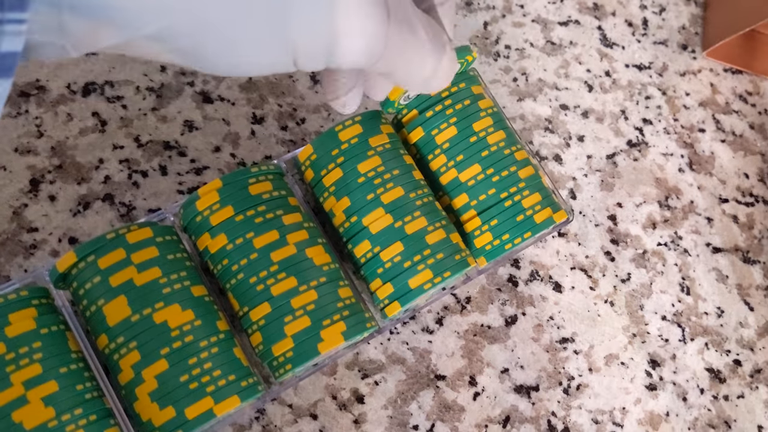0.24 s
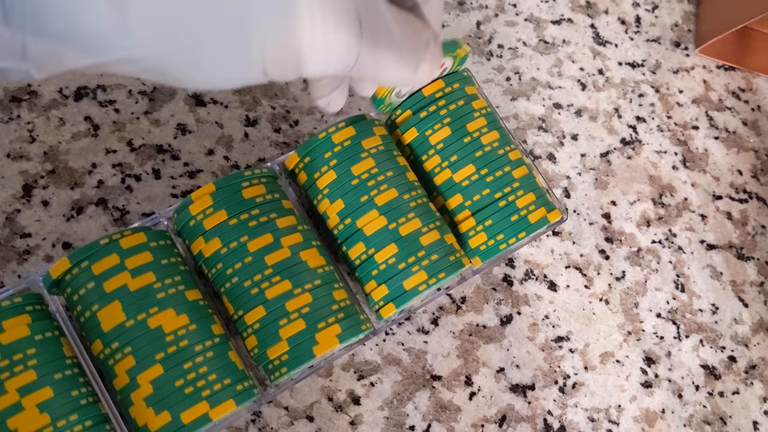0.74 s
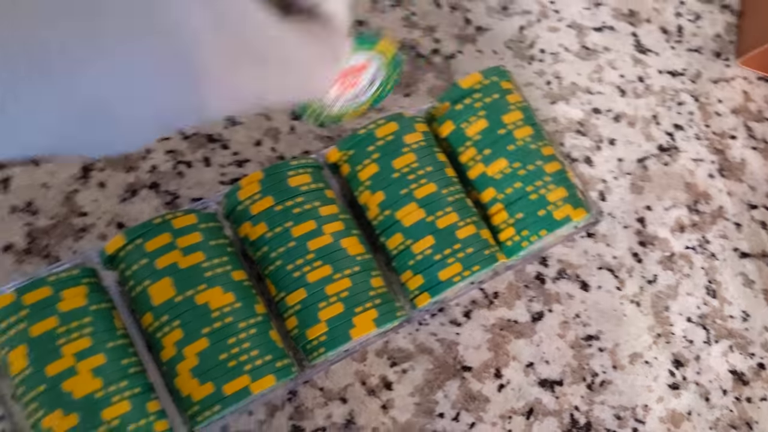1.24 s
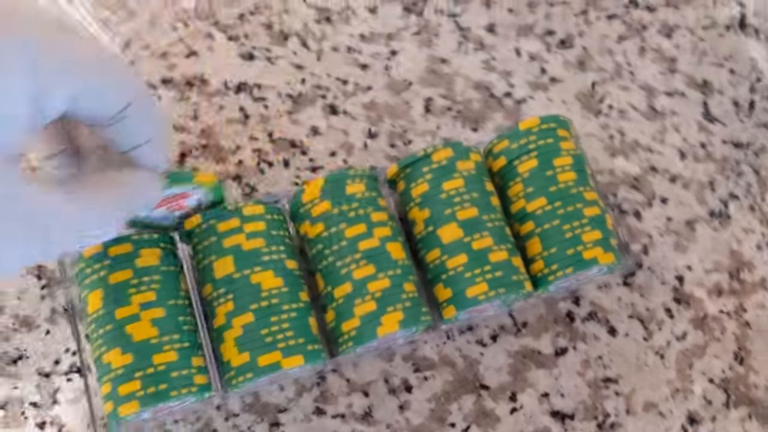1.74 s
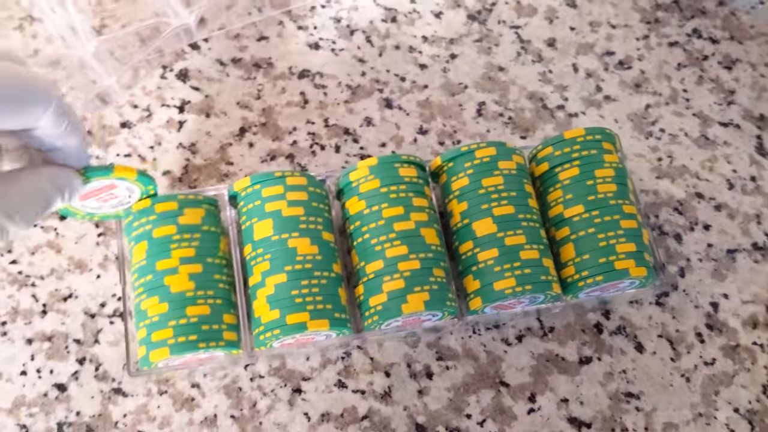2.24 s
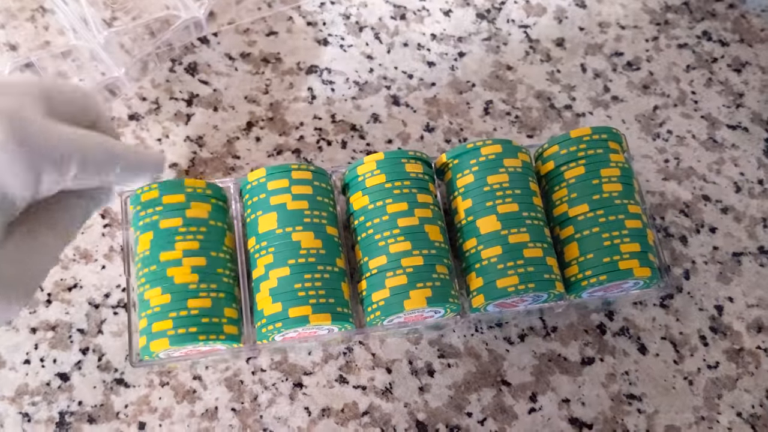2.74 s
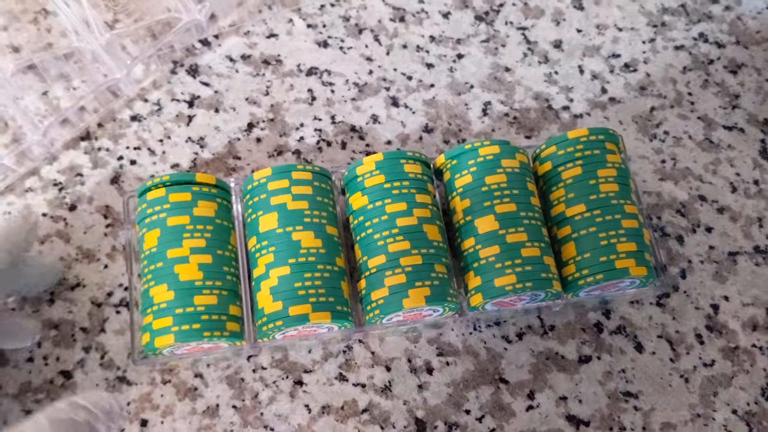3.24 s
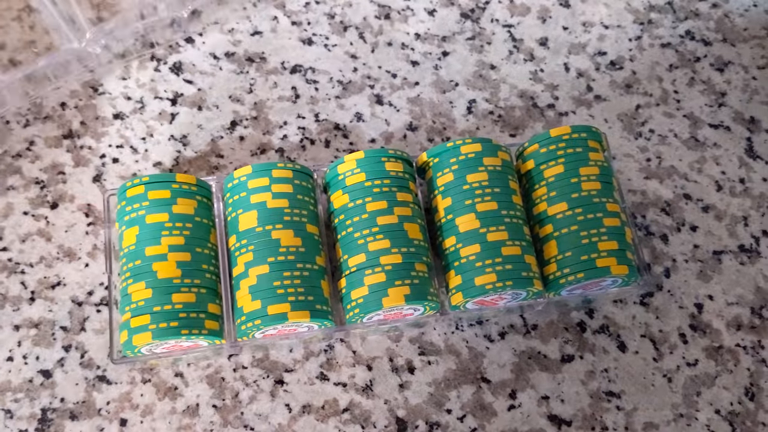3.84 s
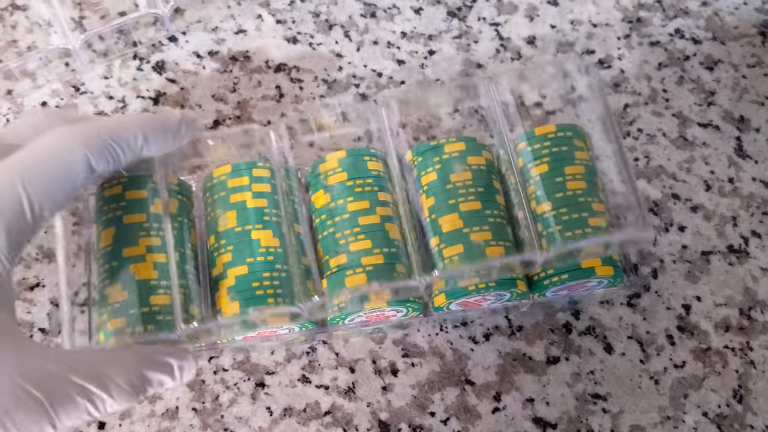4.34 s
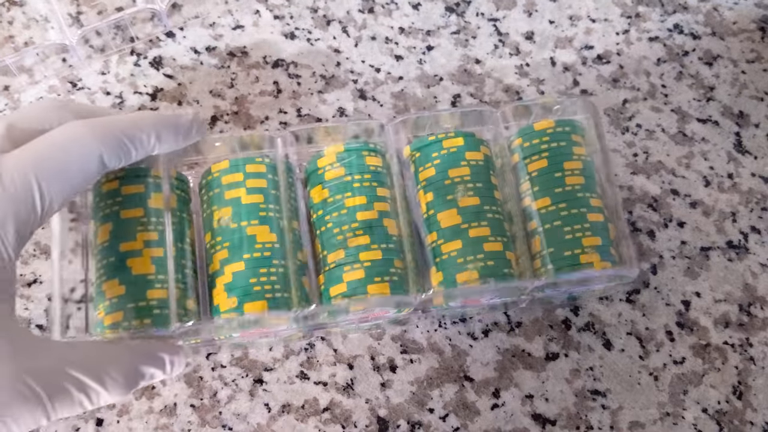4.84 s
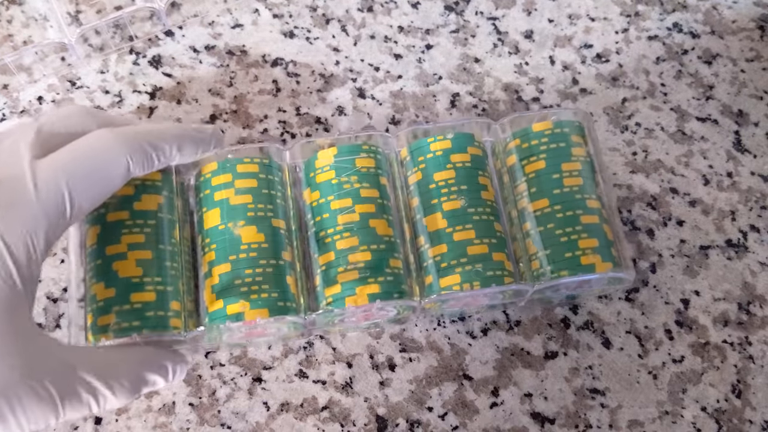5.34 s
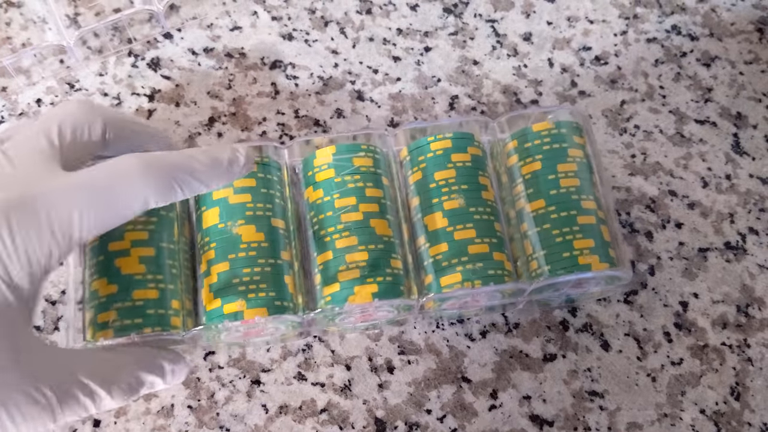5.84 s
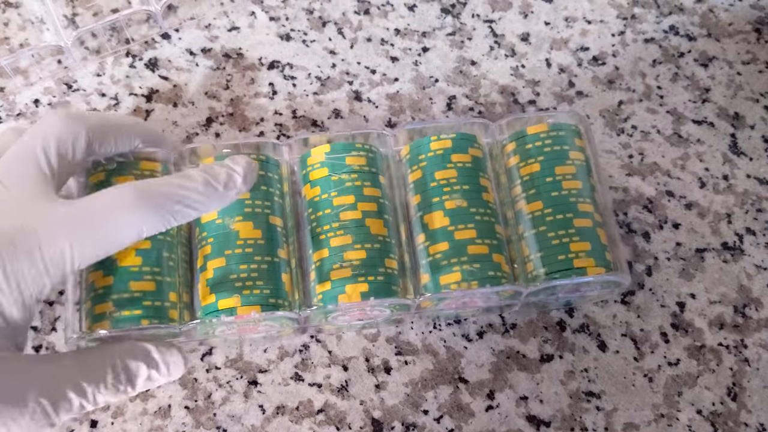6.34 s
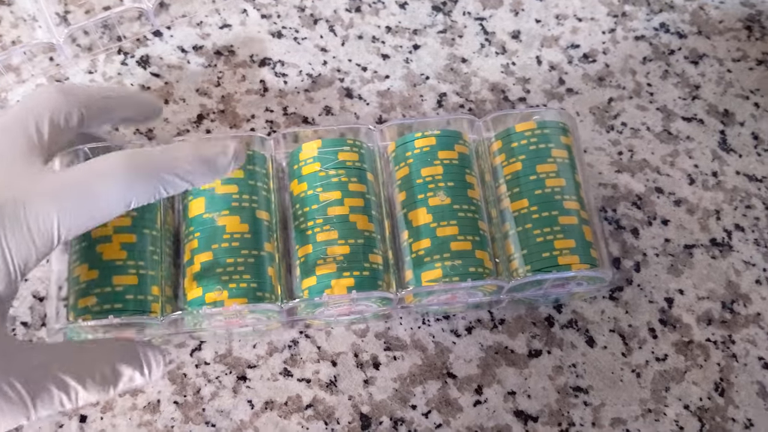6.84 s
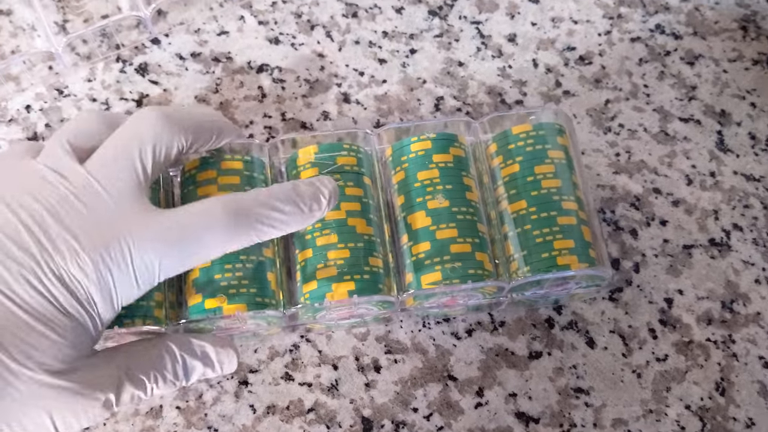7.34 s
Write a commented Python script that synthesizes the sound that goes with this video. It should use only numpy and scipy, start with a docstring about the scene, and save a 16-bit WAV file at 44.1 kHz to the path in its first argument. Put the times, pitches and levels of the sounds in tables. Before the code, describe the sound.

Close up in a small hard room, a clay chip clacks on packed chips in quick crisp taps, drags along them with a dry rub and is pushed in. After a lull with faint ticks, an empty plastic rack bumps the counter, then knocks loudly as a lid and scrapes down in jerky shoves, the stone booming softly beneath. Faint steady background noise.

```python
"""At first a gloved hand taps a clay poker chip on rows of chips, drags it along them and pushes it in.
Then the thin edge of an empty clear plastic rack ticks, the rack bumps on the counter and is worked down
over the rows as a lid: it knocks, sticks and scrapes. Blows are decaying modes, friction is random slips
and jerks, the glove is soft hiss. Throughout, the stone counter booms softly under the blows and rubbing,
a small hard room answers, and background noise runs underneath."""
import sys
import numpy as np
from scipy import signal
from scipy.fft import rfft, irfft, next_fast_len
from scipy.io import wavfile
from scipy.ndimage import uniform_filter1d, map_coordinates

SR = 44100
rng = np.random.default_rng(int(sys.argv[2]) if len(sys.argv) > 2 else 0)


def dump_mix(stems):
    """Bounce the given channels to the path in sys.argv[1] as a 16-bit WAV at rate SR."""
    frames = np.atleast_2d(stems).T  # one column per channel
    limited = np.clip(frames, -1, 1)  # hard clip at full scale
    pcm = np.round(limited * 32767).astype(np.int16)
    wavfile.write(sys.argv[1], SR, pcm)


N = 334719

# Levels in dB are relative, ahead of the trims in the source functions and of the ports.
# Background of the room. Each row: frequency in Hz, density in dB per Hz.
AIR_COLOUR = [(15, -26), (25, -8), (74, -5), (157, -15.5), (326, -20.5), (830, -30.5), (3340, -31.5),
              (3920, -26.5), (5140, -35), (8590, -37.5), (11800, -36.5), (13300, -42), (16000, -53.5)]
# Chip on chips. Each row: time in seconds, strength in dB, hardness in dB per register (body to snap).
CHIP_HITS = [(0.107, -29.5, 3), (0.1595, -15, 1.5), (0.363, -17.5, 3.5), (0.5635, -15.5, 2.5),
             (0.605, -27, 7), (0.647, -34, 5.5), (0.7115, -36, 0.5), (0.7415, -16, 1), (0.7565, -21.5, 3.5),
             (0.7765, -22.5, -2), (0.813, -34, -2), (0.841, -43.5, -3.5), (0.909, -33, 6),
             (0.922, -18, 0.5), (0.938, -21, 0), (1.1085, -18, 0), (1.12, -18.5, -6), (1.449, -45.5, 3.5),
             (1.486, -30.5, 0.5), (1.558, -42.5, -1), (1.664, -41.5, -1), (1.709, -46, 0.5),
             (1.905, -29, -5.5), (1.968, -27.5, -4), (1.985, -30.5, -2.5), (2.056, -25.5, -2),
             (2.679, -33.5, 3.5), (2.691, -49, 10), (2.701, -36, 3.5)]
# Modes of the clay chips. Each row: nominal frequency in Hz, level in dB, t60 in seconds.
CHIP_MODES = [(1080, -3, .04), (1290, -4, .035), (1680, -4, .04), (2030, -3, .04), (2260, -2, .04),
              (2450, 2, .05), (2640, 4, .05), (3020, -3, .04), (3800, 2, .045), (4600, -4, .03),
              (5020, -4, .03)]
# Crowd of short chip modes. Each row: frequency in Hz, density in dB per Hz.
CHIP_COLOUR = [(88, -56.5), (170, -21), (466, -24), (702, -10.5), (871, -15.5), (1120, -1), (1500, -2),
               (2220, 1), (2500, 4), (3420, -11.5), (3840, -6), (5910, -18.5), (11700, -26.5), (16000, -56)]
# Low resonances of counter and cabinet. Each row: frequency in Hz, width in Hz, level in dB.
COUNTER_MODES = [(117.3, 3.2, 2.5), (153, 6.6, 1.5)]
# Soft pushes of the hand on the rows. Each row: time in seconds, strength in dB.
HAND_PUSHES = [(1.909, -50), (1.991, -39), (2.06, -34), (2.68, -46), (5.2, -37), (6.861, -33),
               (7.238, -27.5), (7.42, -30)]
# Decay of the room. Each row: frequency in Hz, t60 in seconds.
ROOM_DECAY = [(600, .5), (2000, 0.57), (5000, .5)]
# Colour of the room's tail. Each row: frequency in Hz, level in dB.
ROOM_TONE = [(150, 16), (600, 1.5), (1300, -2.5), (2450, -2), (3400, -2), (5000, -6.5), (12000, -9.5)]
# Chip dragged along the rows. Each row: start in seconds, length in seconds, rub level in dB,
# hiss over rub in dB, growth of the pressure in dB.
CHIP_DRAGS = [(0.39, 0.13, -52, -24, -11), (1.45, 0.16, -60, -15, -15.5), (1.60, 0.19, -43.5, -15, 6.5),
              (1.785, 0.23, -47.5, -12.5, 0), (2.09, 0.086, -59, -8, 11), (2.18, 0.082, -47.5, -7, 7.5),
              (2.44, 0.26, -40, -5.5, 18.5), (2.74, 0.17, -62, -6.5, -3)]
# Noise of the dragged chip. Each row: frequency in Hz, density in dB per Hz.
DRAG_COLOUR = [(180, -42), (300, -21), (593, -24.5), (820, -22), (1050, -16), (1560, -7.5), (2300, -7),
               (3150, -9), (3900, -8), (5200, -12), (8220, -20.5), (11900, -15.5), (16000, -35.5)]
# Glove brushing past. Each row: start in seconds, length in seconds, level in dB.
GLOVE_BRUSHES = [(1.115, 0.022, -52.5), (3.6, 0.076, -53.5)]
# Hiss of the glove. Each row: frequency in Hz, density in dB per Hz.
GLOVE_HISS = [(300, -15), (2000, -18), (3500, -2), (5000, -4.5), (8000, -10), (11500, -8), (16000, -25)]
# Touches of the rack's thin edge and one snap past the chips. Each row: time in seconds, strength in dB,
# hardness in dB per register, nominal note of the struck wall in Hz.
EDGE_TICKS = [(2.873, -43.5, -4.5, 1450), (2.994, -56, -1.5, 1480), (3.074, -48.5, -3, 1760),
              (3.137, -59, 3.5, 3280), (4.368, -44, -6, 1600), (5.669, -15, -0.5, 1445)]
# Modes of the thin edge. Each row: nominal frequency in Hz, level in dB, t60 in seconds.
EDGE_MODES = [(1464, 0, .055), (3639, -13, .04), (4565, -11, .045), (4947, -14, .035)]
# Empty rack on the counter. Each row: time in seconds, strength in dB, hardness in dB per register,
# nominal note of the struck wall in Hz.
RACK_BUMPS = [(3.828, -57, 3, 960), (3.879, -35, -7.5, 460), (3.893, -28.5, -25, 482),
              (3.905, -21.5, -5, 1313), (3.93, -25.5, -7.5, 787), (3.9465, -20.5, -3, 1618)]
# Modes of the empty rack. Each row: nominal frequency in Hz, level in dB, t60 in seconds.
RACK_MODES = [(340, -13, .08), (458, -10, .08), (715, -10, .06), (802, -3, .06), (930, -7, .07),
              (1034, -9, .07), (1190, -4, .05), (1310, -3, .05), (1615, -3, .055), (2982, -12, .05)]
# Crowd of short rack modes. Each row: frequency in Hz, density in dB per Hz.
RACK_CROWD = [(59, -55), (130, -12.5), (595, -3.5), (784, 3.5), (1420, -10), (1610, -5), (1800, -8.5),
              (3050, -23), (3940, -24), (16000, -48)]
# Contacts of the plastic lid. Each row: time in seconds, strength in dB, hardness in dB per register,
# nominal note of the struck wall in Hz.
LID_KNOCKS = [(4.479, -40.5, -6.5, 1220), (4.495, -47, -4, 2900), (4.533, -6, -11.5, 1143),
              (4.768, -29.5, -7.5, 1520), (4.851, -16, -9, 1300), (4.86, -13, -17, 1190),
              (4.882, -23.5, -40, 1230), (4.95, -30.5, -14, 1300), (4.979, -7.5, -21.5, 1070),
              (5.017, -17.5, -14, 1100), (5.036, -31, -2.5, 4050), (5.093, -20.5, -16.5, 1250),
              (5.113, -24, -25, 1080), (5.127, -22, -9, 1170), (5.188, -17.5, -18, 1240),
              (5.203, -18.5, -16, 1026), (5.2165, -7, -16, 1190), (5.222, -10, -6, 4050),
              (5.254, -17.5, -17, 1340), (5.337, -25.5, -13.5, 1450), (5.423, -26.5, -18, 1560),
              (5.446, -28, -11.5, 940), (5.499, -29, -9.5, 1590), (5.535, -25.5, -13, 1310),
              (5.561, -21.5, -11.5, 1640), (5.576, -28.5, -8, 1850), (5.612, -40, -12, 1030),
              (5.748, -28, -4, 1160), (5.786, -25, -11, 1230), (6.032, -16.5, -7, 1273),
              (6.049, -11, -29, 1190), (6.113, -34, -10, 1620), (6.152, -30, -9.5, 1180),
              (6.229, -24.5, -18.5, 1576), (6.373, -7, -19, 1150), (6.442, -16, -33, 1250),
              (6.483, -14, -23.5, 1140), (6.533, -15, -9.5, 1650), (6.843, -23, -3, 4780),
              (6.853, -22.5, -17.5, 1230), (7.235, -27, -8, 1500), (7.279, -24.5, -14, 1670),
              (7.314, -23.5, -15.5, 1400), (7.377, -23.5, -17, 1390), (7.444, -28.5, -19, 1190),
              (7.46, -20.5, -13.5, 1384), (7.575, -24, -13, 1184)]
# Modes of the lid on the rows. Each row: nominal frequency in Hz, level in dB, t60 in seconds.
LID_MODES = [(745, -26.5, 0.091), (944, -9, 0.049), (1230, -26, 0.01), (1448, -28, 0.15), (1587, -27, 0.19),
             (2910, 2, 0.0062), (4530, -11.5, 0.033)]
# Crowd of short modes of lid and edge. Each row: frequency in Hz, density in dB per Hz.
PLASTIC_COLOUR = [(88, -78), (150, -21.5), (480, -25), (720, -21), (1150, -7.5), (1530, -0.5),
                  (1900, -10.5), (2500, -1.5), (2920, -12.5), (4100, -9), (4950, -16), (5570, -8.5),
                  (6200, -17.5), (12500, -23), (16000, -44)]
# Shoves that slip the lid down the rows. Each row: start in seconds, length in seconds, judder level in dB,
# hiss over judder in dB, growth of the pressure in dB, centre pitch of the judder in Hz.
LID_SHOVES = [(4.8, 0.022, -35.5, -5, 5, 1250), (5, 0.13, -35.5, -14, -1, 1130),
              (5.129, 0.19, -38, -7, -7.5, 1200), (5.376, 0.028, -35, -2.5, -10.5, 750),
              (5.402, 0.047, -26.5, -12.5, 14, 1150), (5.705, 0.048, -23.5, -8, 3, 1040),
              (5.777, 0.17, -39, -7.5, 6, 1150), (5.845, 0.022, -26.5, -25, -12, 1420),
              (5.97, 0.047, -24, -6.5, 0.5, 1050), (6.016, 0.038, -23, -2, -2, 1230),
              (6.272, 0.06, -43, -5.5, -7, 1200), (6.34, 0.063, -20.5, -5.5, 1.5, 1000),
              (6.407, 0.034, -34, -1.5, -5, 1260), (6.471, 0.12, -37, -4.5, 5, 1400),
              (6.732, 0.063, -35.5, -4.5, 8.5, 720), (6.786, 0.039, -24, -5, 11, 690),
              (6.825, 0.023, -24.5, 1, 0, 1180), (6.967, 0.018, -32, -19.5, 3, 1500),
              (7.222, 0.12, -34, -13.5, 8, 1300), (7.365, 0.052, -33.5, -11.5, 2, 1250),
              (7.562, 0.029, -30, -18, -13.5, 900)]
# Noise of the scraping lid. Each row: frequency in Hz, density in dB per Hz.
SHOVE_COLOUR = [(88, -36), (230, -29), (380, -18), (524, -27.5), (689, -7), (800, -27), (979, -32),
                (1500, -12), (1950, -15.5), (2500, -14), (3350, -18.5), (4490, -15), (7770, -27.5),
                (9630, -28.5), (16000, -43)]
# Likeness of the two ports. Each row: frequency in Hz, likeness from 0 to 1.
LIKENESS = [(50, .68), (150, .83), (600, .96), (1200, .82), (2200, .45), (4000, .15), (15000, .05)]
# Balance of the two ports. Each row: frequency in Hz, left minus right in dB.
PORT_BALANCE = [(150, 1.5), (400, 4.5), (1000, 3.5), (1500, -1.5), (3000, -1.5), (4200, -7.5), (8500, 7.5),
                (12000, 5), (15000, -3)]
# Colour shared by both ports. Each row: frequency in Hz, level in dB.
PORT_COLOUR = [(5600, -0.5), (6400, -2), (7000, 2), (7900, -2.5), (9500, 3.5), (10300, 0.5), (13300, 3)]


def amp(db):
    """Decibels to gain."""
    return 10 ** (np.asarray(db) / 20)


def unit(x):
    """Scale to rms 1."""
    return x / np.sqrt(np.mean(x ** 2) + 1e-20)


def along(points, hz):
    """Read (Hz, value) points on a log frequency axis."""
    point_hz, value = np.transpose(points)
    return np.interp(np.log(hz + 1), np.log(point_hz + 1), value)


def filtered(x, response):
    """Multiply the spectrum of x by a response of frequency."""
    n = x.shape[-1]
    padded = next_fast_len(n + n // 4)
    hz = np.fft.rfftfreq(padded, 1 / SR)
    return irfft(rfft(x, padded) * response(hz), padded)[..., :n]


def port_angle(hz):
    """Half the angle between the ports whose cosine is their likeness."""
    return np.arccos(np.clip(along(LIKENESS, hz), -1, 1)) / 2


def spread(pair, colour):
    """Turn two unrelated signals into a coloured left and right, alike in the bass, of rms 1."""
    def response(hz):
        angle = port_angle(hz)
        return amp(along(colour, hz)) * [np.cos(angle), np.sin(angle)]

    mid, side = filtered(pair, response)
    return unit(np.array([mid + side, mid - side]))


def split(x, cross_hz):
    """Split x at a crossover of fourth-order low and high passes."""
    def low(hz):
        ratio = hz / cross_hz
        return 1 / (1 + np.sqrt(2) * 1j * ratio - ratio ** 2) ** 2

    return filtered(x, low), filtered(x, lambda hz: low(hz) * (hz / cross_hz) ** 4)


def wobble(knots_per_s):
    """Draw a smooth random curve through evenly timed knots."""
    knots = rng.standard_normal(int(N * knots_per_s / SR) + 4)
    return map_coordinates(knots, [np.arange(N) * knots_per_s / SR])


def patchy(length, depth_db):
    """Two noises whose strong frequencies shift as the point of contact moves."""
    z = signal.stft(rng.standard_normal((2, length)), nperseg=256)[2]
    field = uniform_filter1d(rng.standard_normal(z.shape[1:]), size=2, axis=0)
    field = uniform_filter1d(field, size=16, axis=1)
    gain = amp(depth_db * np.clip(unit(field), -2, 2))
    return signal.istft(z * gain, nperseg=256)[1][:, :length]


def background_air():
    """Steady coloured noise of the room."""
    return amp(-58.5) * spread(rng.standard_normal((2, N)), AIR_COLOUR)


def blow(modes, colour, t60_s, ring_db, attack_s, detune, treble_life):
    """One contact rings in three registers (body, clack, snap), each of rms 1 over its first 10 ms."""
    t = np.arange(SR // 10) / SR
    # a crowd of short modes, the highest dying first
    low, high = split(spread(patchy(len(t), depth_db=4), colour), 5500)
    crowd = low * amp(-60 * t / t60_s) + high * amp(-60 * t / (t60_s * treble_life))

    # every contact point favours other modes; high ones reach the ports out of step
    hz, db, life_s = np.transpose(modes)[:, :, None]
    size, shift, phase, skew = rng.standard_normal((4, len(modes), 1))
    gain = unit(amp(db + 0.63 * size)) / np.sqrt(len(modes))
    envelope = gain * amp(-60 * t / life_s)
    angle = 2 * np.pi * (hz * (1 + detune * shift) * t + phase)
    lead = skew * port_angle(hz)
    ring = np.array([(envelope * np.sin(angle + side * lead)).sum(0) for side in (1, -1)])

    body, rest = split(crowd + amp(ring_db) * ring, 1800)
    clack, snap = split(rest, 5500)
    # the heavier body takes longer to swing up than the snap
    rise_s = attack_s / np.array([1, 1.5, 3])[:, None, None]
    registers = np.array([body, clack, snap]) * (1 - np.exp(-(t / rise_s) ** 2))
    onset = registers[..., :SR // 100]
    return registers / np.sqrt(np.mean(onset ** 2, axis=(1, 2), keepdims=True))


def blows(table, modes, colour, rattle_db, rattle_gap_s, lead_in_db, clack_db, wall_db=0, wall_t60_s=.03,
          **body):
    """Contacts of one kind: hardness tilts the registers; a struck wall adds its own hollow note."""
    out = np.zeros((2, N + SR))
    for time_s, strength_db, hardness_db, *wall_hz in table:
        gains = amp(strength_db + hardness_db * np.arange(3) + np.array([0, clack_db, 0]))
        ringing = list(modes) + [(hz, wall_db, wall_t60_s) for hz in wall_hz]
        # a faint lead-in, then the blow, then a loose neighbour rattles back
        before_s, after_s = rattle_gap_s * rng.uniform(0.46, 2, 2)
        touches = [(-before_s, lead_in_db, modes), (0, 0, ringing), (after_s, rattle_db, modes)]
        for delay_s, db, voices in touches:
            hit = amp(db) * np.tensordot(gains, blow(voices, colour, **body), 1)
            first = round((time_s + delay_s) * SR)
            out[:, first:first + hit.shape[1]] += hit
    return out[:, :N]


def chip_clacks():
    """Clay chip on chips: dense short modes, each pitch varying from blow to blow."""
    return amp(-7.5) * blows(
        CHIP_HITS, CHIP_MODES, CHIP_COLOUR, t60_s=0.043, ring_db=-3.5, attack_s=0.0017, detune=.04,
        treble_life=0.58, rattle_db=-15.0, rattle_gap_s=0.0036, lead_in_db=-30.5, clack_db=5.0)


def resonances(x, peaks):
    """Sum band-pass resonances of alternating sign."""
    def response(hz):
        total = 0
        for k, (centre, width, db) in enumerate(peaks):
            damping = 1j * hz * width
            total = total + (-1) ** k * amp(db) * damping / (centre ** 2 - hz ** 2 + damping)
        return total

    return filtered(x, response)


def counter_boom(contacts, push_decay_s):
    """Noise shaped by the force of contacts and hand sets slab and cabinet booming."""
    t = np.arange(N) / SR
    hand = sum(amp(db) * (t > s) * np.exp(-np.abs(t - s) / push_decay_s) for s, db in HAND_PUSHES)
    strength = np.abs(contacts).mean(0) + amp(23.5) * hand
    force = strength * spread(rng.standard_normal((2, N)), [(100, 0)])
    return resonances(force, COUNTER_MODES)


def room(x, build_s):
    """A diffuse tail builds up as the walls answer; it is redrawn every third of a second."""
    out, block = np.zeros((2, N + SR)), SR // 3
    for start in range(0, N, block):
        hz, t, z = signal.stft(rng.standard_normal((2, SR // 2)), SR, nperseg=256)
        decay = amp(-60 * t / along(ROOM_DECAY, hz)[:, None])
        fade = decay * (1 - np.exp(-(t / build_s) ** 2))
        tail = spread(signal.istft(z * fade, SR, nperseg=256)[1], ROOM_TONE)
        tail = tail / np.linalg.norm(tail[0])
        wet = signal.fftconvolve(x[:, start:start + block], tail, axes=1)
        out[:, start:start + wet.shape[1]] += wet
    return out[:, :N]


def strokes(table, attack_s, release_t60_s):
    """Low and high gains of friction: each stroke sets in, changes pressure to its end and dies away."""
    out = np.zeros((2, N))
    for start_s, length_s, db, hiss_db, swell_db, *_ in table:
        t = np.arange(N) / SR - start_s
        pressure_db = swell_db * (np.clip(t / length_s, 0, 1) - 1)
        release_db = -60 * np.maximum(t - length_s, 0) / release_t60_s
        envelope = np.clip(t / attack_s, 0, 1) * amp(pressure_db + release_db)
        out += np.outer(amp([db, db + hiss_db]), envelope)
    return out


def friction(gains, colour, slips_per_s, uneven_db, power_decay_s, cross_hz, clump_db):
    """Edges catch and slip at random, each slip a tiny noise burst; the strokes set the strength."""
    sizes = amp(uneven_db * np.clip(rng.standard_normal(N), -2, 2))
    catches = (rng.random(N) < slips_per_s / SR) * sizes
    power = signal.lfilter([1], [1, -np.exp(-1 / (power_decay_s * SR))], catches ** 2)
    grit = np.sqrt(power) * patchy(N, depth_db=4)
    out = 0
    for part, gain in zip(split(spread(grit, colour), cross_hz), gains):
        # the pressure wavers, so the slips come in clumps
        out = out + gain * unit(part * amp(clump_db * wobble(70)))
    return out


def chip_rub():
    """The edge of the dragged chip catches unevenly along the rows."""
    drags = strokes(CHIP_DRAGS, attack_s=.035, release_t60_s=0.055)
    return amp(3.5) * friction(drags, DRAG_COLOUR, slips_per_s=580, uneven_db=4.5, power_decay_s=0.0039,
                               cross_hz=5570, clump_db=-2.0)


def glove():
    """Thin rubber brushes past: an even, soft hiss."""
    rows = [(*row, 0, 0) for row in GLOVE_BRUSHES]
    gains = strokes(rows, attack_s=0.018, release_t60_s=0.32)
    return gains * spread(patchy(N, depth_db=-1.5), GLOVE_HISS)


def edge_ticks():
    """The rack's thin plastic edge pings in a few long modes."""
    return amp(-5.0) * blows(
        EDGE_TICKS, EDGE_MODES, PLASTIC_COLOUR, t60_s=.055, ring_db=3, attack_s=0.0017, detune=0.018,
        treble_life=0.7, rattle_db=-11.0, rattle_gap_s=0.0026, lead_in_db=-24.5, clack_db=2.5,
        wall_db=1, wall_t60_s=.03)


def rack_bumps():
    """The empty rack swings up slowly and rings hollow on the counter."""
    return amp(-9.0) * blows(
        RACK_BUMPS, RACK_MODES, RACK_CROWD, t60_s=0.085, ring_db=7.5, attack_s=0.0064, detune=0.03,
        treble_life=0.25, rattle_db=-7, rattle_gap_s=0.005, lead_in_db=-9, clack_db=10.5,
        wall_db=6.5, wall_t60_s=0.072)


def lid_knocks():
    """The lid knocks on the rows; the struck wall adds a short hollow note."""
    return amp(-6.0) * blows(
        LID_KNOCKS, LID_MODES, PLASTIC_COLOUR, t60_s=.058, ring_db=9, attack_s=0.002, detune=0.035,
        treble_life=0.4, rattle_db=-13.5, rattle_gap_s=0.006, lead_in_db=-26.5, clack_db=6.5,
        wall_db=8, wall_t60_s=0.029)


def judder(count, peak_s, pitch_octaves, size_db):
    """The lid moves in quick uneven jerks of a few cycles; their centre pitch glides between shoves."""
    t = np.arange(SR // 60) / SR
    moment, size, wall, skew = rng.standard_normal((count, 4)).T[:, :, None]
    start = (np.arange(count)[:, None] + moment / 2) * N / count
    start = np.clip(start, 0, N).astype(int)
    shove_s, *_, shove_hz = np.transpose(LID_SHOVES)
    hz = np.interp(start / SR, shove_s, shove_hz)
    swing = amp(size_db * np.clip(size, -2, 2)) * t / peak_s * np.exp(-t / peak_s)
    angle = 2 * np.pi * hz * 2 ** (pitch_octaves * wall) * t
    lead = skew * port_angle(hz)
    where = (start + np.arange(len(t))).ravel()
    ports = []
    for side in (1, -1):
        jerks = swing * np.sin(angle + side * lead)
        ports.append(np.bincount(where, jerks.ravel(), N)[:N])
    return unit(np.array(ports))


def lid_scrape():
    """Shoves make the lid judder and grate down the rows."""
    shoves = strokes(LID_SHOVES, attack_s=.017, release_t60_s=0.094)
    jerks = judder(count=1900, peak_s=.0017, pitch_octaves=.16, size_db=3.5)
    grating = friction(amp([[-7.5], [-1.5]]) * shoves, SHOVE_COLOUR, slips_per_s=510, uneven_db=-2.0,
                       power_decay_s=0.012, cross_hz=2340, clump_db=3.5)
    return amp(-2.5) * shoves[0] * jerks + grating


def scene():
    """Chips, rack and lid on the counter, in the room."""
    air = background_air()
    chips, rub = chip_clacks(), chip_rub()
    ticks, rack = edge_ticks(), rack_bumps()
    lid, scrape = lid_knocks(), lid_scrape()
    # chips, lid, rack, scrape and rub drive the counter, each with its own weight
    contacts = amp(-2.5) * chips + amp(3.5) * lid + amp(-16.5) * rack
    contacts += amp(8.5) * scrape + amp(10.0) * rub
    boom = counter_boom(contacts, push_decay_s=0.027)
    dry = chips + lid + rack + ticks + scrape + rub + glove()
    return dry + boom + amp(-16.0) * room(dry, build_s=0.01) + air


def record(dry):
    """Two ports colour the sound, cut rumble, round peaks and limit the band."""
    def port_response(hz):
        lean = amp(np.outer([1, -1], along(PORT_BALANCE, hz)) / 2)
        rumble_cut = 1 - np.exp(-(hz / 34) ** 4)
        return lean / np.sqrt(np.mean(lean ** 2, axis=0)) * rumble_cut

    ported = filtered(dry, port_response)
    ported = filtered(ported, lambda hz: amp(along(PORT_COLOUR, hz)))
    rounded = ported / (1 + (ported / .9) ** 4) ** (1 / 4)
    top_hz = 15900
    return filtered(rounded, lambda hz: 1 / np.sqrt(1 + (hz / top_hz) ** 200))


dry = scene()
out = record(dry)
dump_mix(out)
```